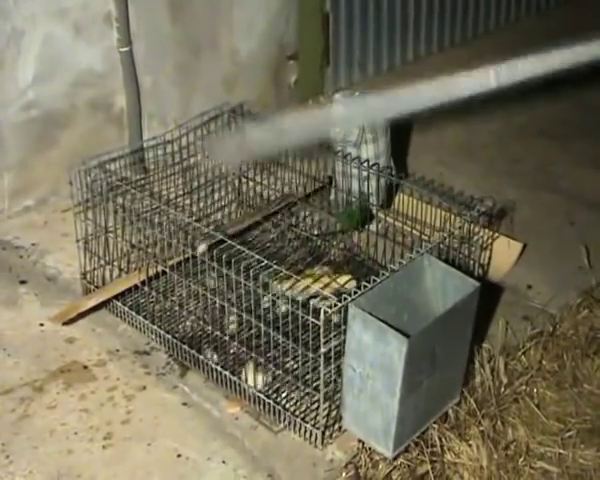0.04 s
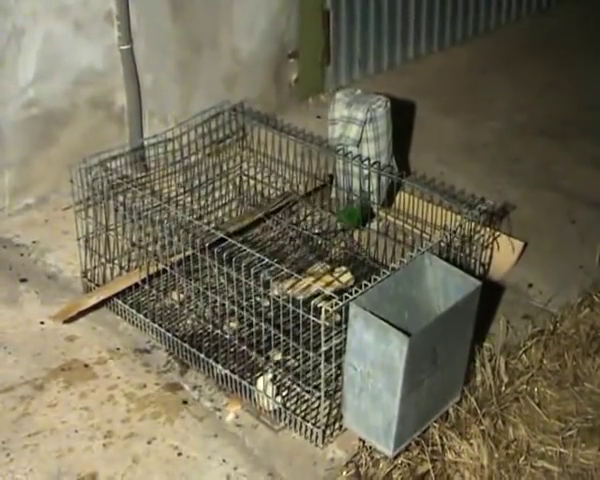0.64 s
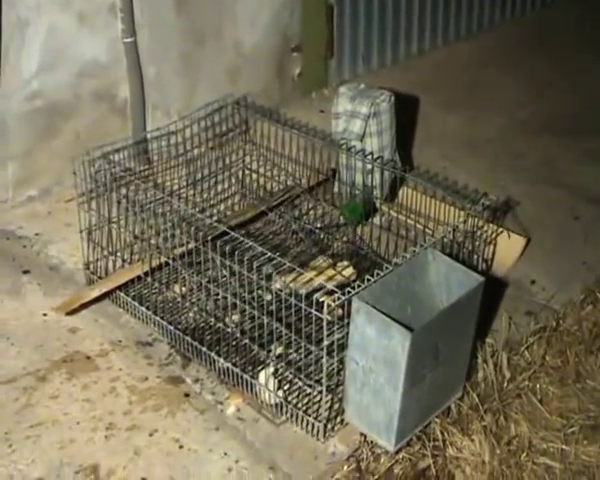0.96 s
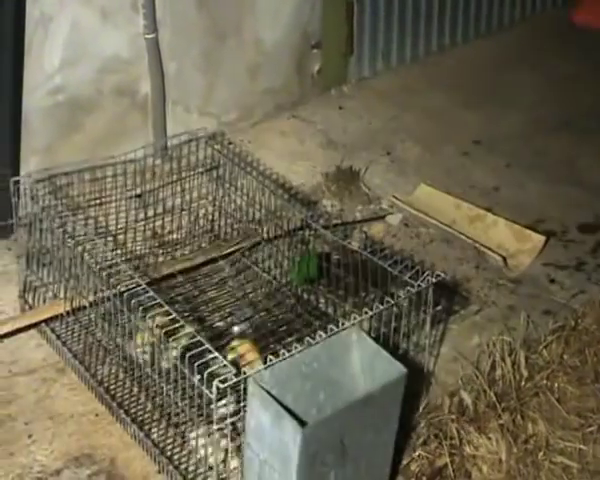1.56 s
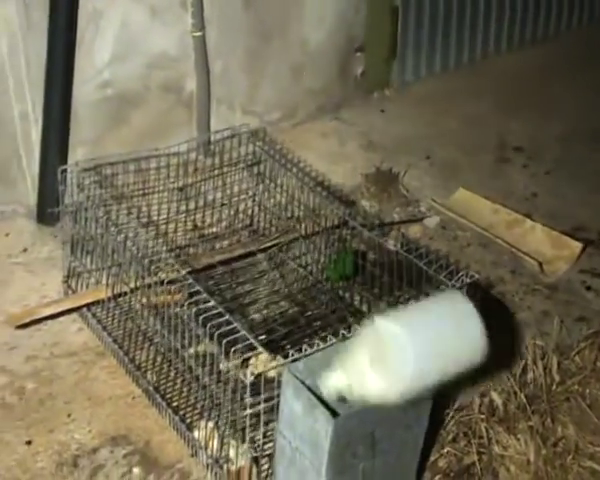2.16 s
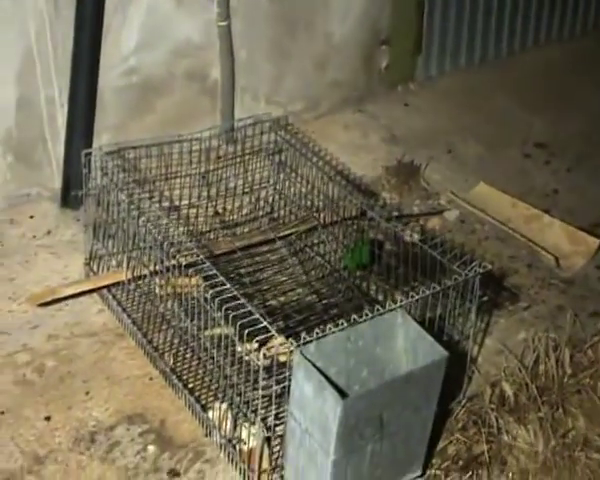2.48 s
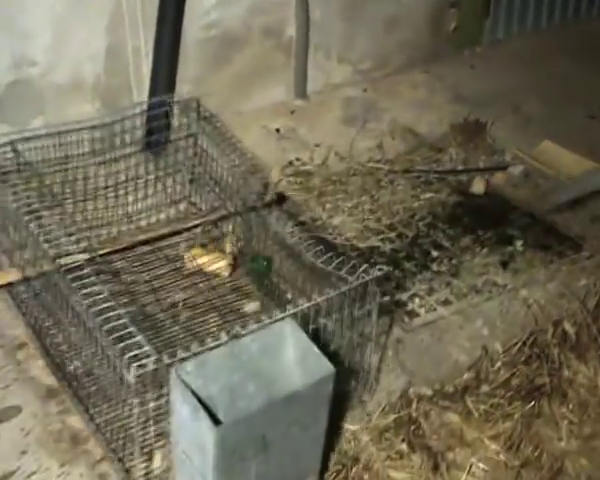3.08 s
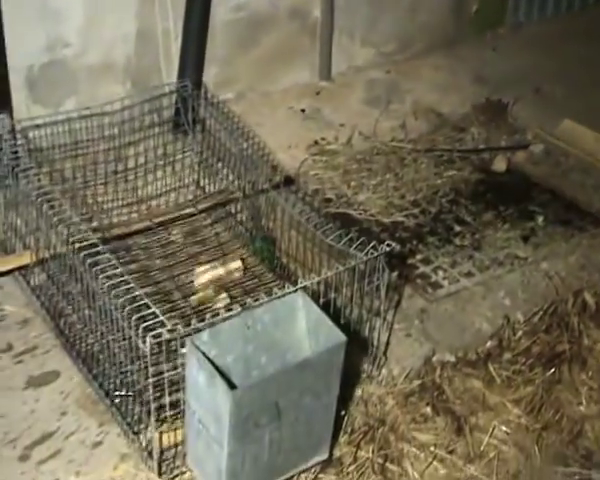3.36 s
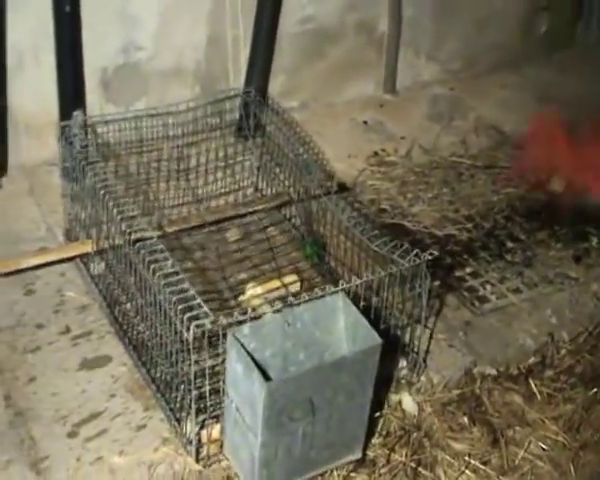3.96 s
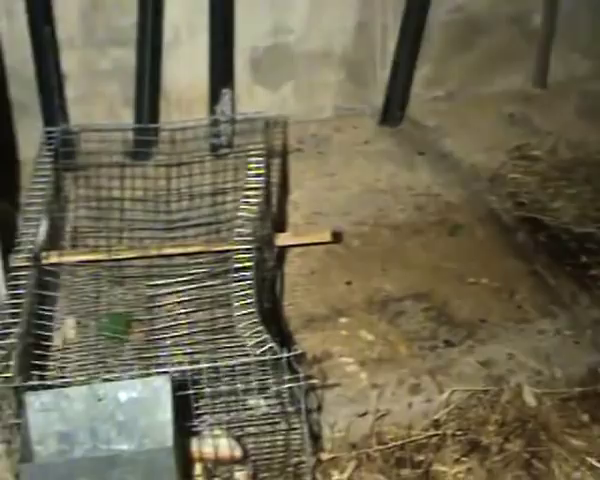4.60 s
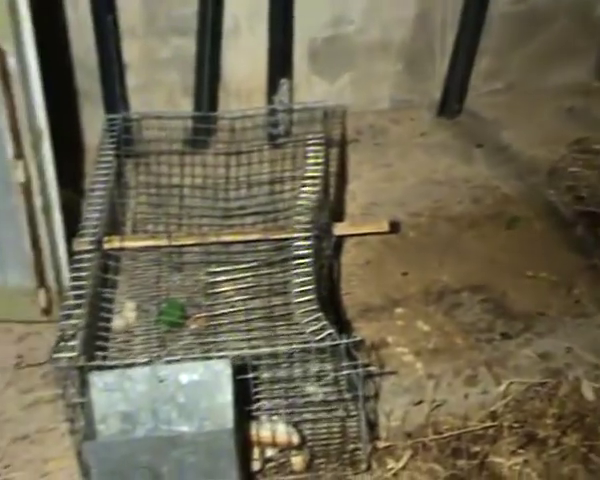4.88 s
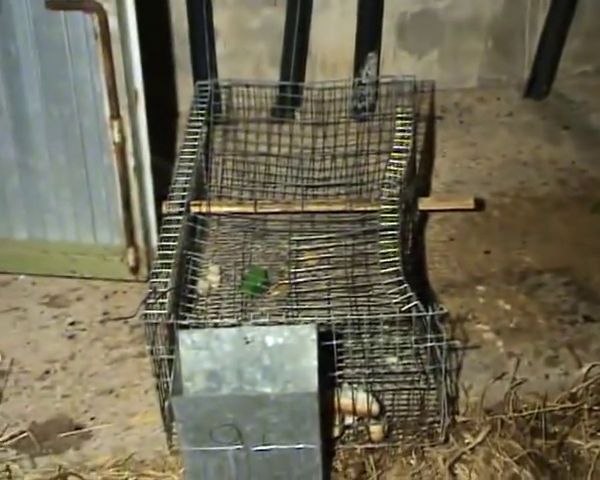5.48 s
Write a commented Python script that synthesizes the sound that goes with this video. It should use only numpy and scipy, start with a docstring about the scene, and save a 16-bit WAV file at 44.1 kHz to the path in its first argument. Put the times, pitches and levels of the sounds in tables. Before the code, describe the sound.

A metal bar crashes repeatedly against a wire cage, which rattles and rings, with a plastic bottle bouncing and sheet metal rumbling.

```python
"""Striking a wire cage

A metal bar hits a wire cage on a concrete floor: each blow crashes, then the mesh shakes, loose rods
ping and the frame thumps. Fine spray hisses, scraps patter down, and a plastic bottle falls on the
cage and bounces away. The last blow shoves the cage against a sheet-metal wall, which rumbles while
metal goes on clacking. The loudest peaks overload the microphone."""
import sys
import numpy as np
from scipy import signal
from scipy.fft import rfft, irfft, next_fast_len
from scipy.io import wavfile
from scipy.ndimage import uniform_filter1d, map_coordinates

SR = 44100
rng = np.random.default_rng(int(sys.argv[2]) if len(sys.argv) > 2 else 0)


def unload_wav(signal):
    """Save mono or channel-first audio to the path in sys.argv[1] as 16-bit WAV at rate SR, clipped to [-1, 1]."""
    wavfile.write(
        sys.argv[1],
        SR,
        np.round(np.clip(np.atleast_2d(signal).T, -1, 1) * 32767).astype(np.int16),
    )


N = 248724
TIME = np.arange(N) / SR  # seconds into the scene
AGE = TIME[:SR]  # seconds into a one-second sound

# the bright tone of jingling wires: f/Hz, level/dB
JINGLE_SPECTRUM = [(1500, -13), (2800, 11.5), (3700, 5), (6200, 0.5), (7800, 1), (10000, 2), (12000, -5.5),
                   (15500, -11.5)]


def amp(db):
    """Turn decibels into a gain to multiply by."""
    return 10 ** (np.asarray(db) / 20)


def unit(x):
    """Scale a sound to an average (rms) level of 1."""
    return x / np.sqrt(np.mean(x ** 2) + 1e-20)


def along(points, hz):
    """Read between (frequency, value) points, spacing octaves evenly."""
    freqs, values = np.transpose(points)
    return np.interp(np.log(hz + 1), np.log(freqs), values)


def filtered(x, response):
    """Multiply each frequency in a sound by response(hz)."""
    size = next_fast_len(len(x) + 8192)
    return irfft(rfft(x, size) * response(np.fft.rfftfreq(size, 1 / SR)), size)[:len(x)]


def coloured(x, spectrum):
    """Shape a sound with a table of levels by frequency; rms 1."""
    return unit(filtered(x, lambda hz: amp(along(spectrum, hz))))


def noise(spectrum, size):
    """Noise with the given spectrum; rms 1."""
    return coloured(rng.standard_normal(size), spectrum)


def resonance(hz, centre, width):
    """How one mode (a natural note of an object) responds at each frequency."""
    return 1j * hz * width / (centre ** 2 - hz ** 2 + 1j * hz * width)


def resonate(x, modes):
    """Pass a sound through modes given as f/Hz, width/Hz, level/dB; rms 1."""
    return unit(filtered(x, lambda hz: sum(amp(db) * resonance(hz, f, width) for f, width, db in modes)))


def fade(t60):
    """A one-second gain curve that falls by 60 dB every t60 seconds."""
    return np.exp(-np.log(1000) * AGE / max(t60, 1e-3))


def onset(rise_s):
    """A one-second gain curve that climbs from 0 towards 1."""
    return 1 - np.exp(-AGE / rise_s)


def ring(hz, t60):
    """One pure note dying away."""
    return np.sin(2 * np.pi * (hz * AGE + rng.random())) * fade(t60)


def swell(start, rise_s, hold_s, fall_db_per_s, drop_db=0, drop_s=0.05):
    """A gain that rises and holds, then drops as the first violent motion dies and keeps falling."""
    age = np.maximum(TIME - start, 0)
    late = np.maximum(age - hold_s, 0)
    fallen_db = fall_db_per_s * late + drop_db * (1 - np.exp(-late / drop_s))
    return (1 - np.exp(-age / rise_s)) * amp(-fallen_db)


def wobble(rate, size):
    """A curve that moves to a new random value rate times a second."""
    values = rng.standard_normal(int(size * rate / SR) + 4)
    return map_coordinates(values, [np.arange(size) * rate / SR], order=1)


def add(track, t, sound):
    """Mix a sound into the track at t seconds."""
    start = round(t * SR)
    sound, start = sound[max(-start, 0):], max(start, 0)
    track[start:start + len(sound)] += sound[:N - start]


def collisions(rate, spread_db, clump_db=4):
    """Wire hits wire about rate times a second, unevenly and in little bursts."""
    kicks = (rng.random(N) < rate / SR) * rng.choice([-1, 1], N)
    return kicks * amp(spread_db * rng.uniform(-1.3, 1, N) + clump_db * wobble(55, N))


def mesh_ring(t60, click, count):
    """One touch on the mesh gives a click and a crowd of unrelated wire notes."""
    hz = (300 + 15500 * rng.random(count) ** 1.5).astype(int)
    spectrum = np.zeros(SR // 2 + 1, complex)
    spectrum[hz] = hz ** (1 / 6) * np.exp(2j * np.pi * rng.random(count))
    wires = irfft(spectrum, SR) * fade(t60)
    tick = rng.standard_normal(SR) * fade(0.016)
    return unit(wires) + click * unit(tick)


def rattle(spectrum, rate, spread_db, t60, click):
    """A stream of collisions makes the mesh ring and click."""
    ringing = signal.fftconvolve(collisions(rate, spread_db), mesh_ring(t60, click=0, count=520))[:N]
    clicks = signal.fftconvolve(collisions(rate, spread_db), rng.standard_normal(SR) * fade(0.0056))[:N]
    return coloured(unit(ringing) + click * unit(clicks), spectrum)


def singing_wires():
    """Collisions keep the longest wires ringing at a fairly even level."""
    # notes of the long wires: f/Hz, width/Hz, level/dB
    modes = [(1930, 17, -1.5), (2550, 5, 1), (2926, 25, -6.5), (5220, 32, -15.5)]
    song = resonate(collisions(rate=1300, spread_db=12, clump_db=10), modes)
    return song / np.sqrt(np.abs(uniform_filter1d(song ** 2, size=4400)) + 0.1)


def panel_drone(side_hz, side_db, lid_hz, lid_db, frame_db, upper_db, width_hz=19):
    """Collisions keep the dented panels ringing with a hollow sound."""
    # notes of the frame: f/Hz, width/Hz, level/dB
    frame_modes = [(254, 3.6, 5.5), (353, 12.2, 7), (416, 48, -40)]
    # higher notes of the bending mesh: f/Hz, width/Hz, level/dB
    upper_modes = [(611.5, 20, 2.5), (688, 8, -1.5), (798, 61, -11.5), (947, 61, -12.5), (1162, 40, -8),
                   (1350, 38, -42)]
    modes = [(side_hz, 1.6 * width_hz, side_db), (lid_hz, width_hz, lid_db)]
    modes += [(hz, width, db + frame_db) for hz, width, db in frame_modes]
    modes += [(hz, width, db + upper_db) for hz, width, db in upper_modes]
    drone = resonate(collisions(rate=900, spread_db=-2, clump_db=-0.5), modes)
    # the panels trade energy, so the total stays even
    return drone / np.sqrt(np.abs(uniform_filter1d(drone ** 2, size=2600)) + 0.038)


def shaking_cage():
    """After each impact the panels flex and drone while the wires clatter, jingle and sing."""
    # impacts that shake the cage: t/s, panel/dB, mesh/dB, jingle/dB, hold/s, drop after the hold/dB
    shakes = [(-0.02, -12, -14, -22.5, 0.035, 10.5), (1.255, -12.5, -19, -25, .135, 2),
              (2.211, -10, -19.5, -27, 0.056, 16), (2.903, -11, -15.5, -23.5, 0.078, 1),
              (4.111, -14, -14, -22.5, 0.054, 2)]
    # each impact dents and retunes the panels: side/Hz, side/dB, lid/Hz, lid/dB, frame/dB, upper/dB
    dents = [(545, 3, 678, 4, -5, -8), (522, 2, 680, 5, -6, -4), (517, 2, 664, 4, -10, -5),
             (485, -3, 625, 6, -10, 4), (472, 2, 685, 2, -8, 8)]
    # the cage rocks back onto the floor and scrapes: t/s, length/s, panel/dB, mesh/dB, jingle/dB
    rebounds = [(0.198, 0.02, -24.5, -30.5, -40), (1.535, 0.099, -29, -24.5, -31.5),
                (3.232, 0.027, -27, -20.5, -34), (3.617, 0.023, -40, -34, -42.5),
                (4.335, 0.033, -28, -16.5, -22)]
    # the tone of the clattering mesh: f/Hz, level/dB
    mesh_spectrum = [(40, -29), (90, -20), (200, 6), (400, 0.5), (850, 4.5), (1400, -1), (1950, 3),
                     (2800, -1), (3700, -27), (6000, -49)]
    panel_rise_s, wire_rise_s = 0.018, 0.0029  # heavy panels take longer to get going
    clatter = rattle(mesh_spectrum, rate=900, spread_db=1.5, t60=0.3, click=0.51)
    jingle = amp(6) * rattle(JINGLE_SPECTRUM, rate=760, spread_db=-2.5, t60=0.15, click=0.57)
    song, out = singing_wires(), np.zeros(N)
    next_times = [row[0] for row in shakes[1:]] + [np.inf]
    for (t, panel_db, mesh_db, jingle_db, hold, drop_db), next_t, dent in zip(shakes, next_times, dents):
        gains = np.array([
            amp(panel_db) * swell(t, panel_rise_s, hold, fall_db_per_s=46, drop_db=drop_db),
            amp(mesh_db) * swell(t, wire_rise_s, hold, fall_db_per_s=38.5, drop_db=drop_db),
            amp(jingle_db) * swell(t, wire_rise_s, hold, fall_db_per_s=47, drop_db=drop_db)])
        for start, length, *levels_db in rebounds:
            if t < start < next_t:
                scrape = swell(start, rise_s=0.0077, hold_s=length, fall_db_per_s=139)
                gains = np.hypot(gains, amp(levels_db)[:, None] * scrape)  # energies add up
        panel_gain, mesh_gain, jingle_gain = gains
        song_gain = amp(mesh_db - 16) * swell(t, panel_rise_s, hold, fall_db_per_s=27, drop_db=drop_db / 2)
        out += panel_gain * panel_drone(*dent)
        out += mesh_gain * clatter + jingle_gain * jingle + song_gain * song
    return out


def bar_blows():
    """The bar crashes as it rakes over many wires in a few hundredths of a second."""
    # hard hits on the mesh: t/s, level/dB, contact time/s
    blows = [(-0.01, -15.5, 0.013), (0.203, -25, 0.012), (1.257, -9, 0.031), (2.229, -17, 0.015),
             (2.26, -45, 0.0028), (2.904, -1, 0.017), (3.204, -20, 0.0068), (4.11, -1, 0.017),
             (4.353, -17, 0.057)]
    # the tone of the crash: f/Hz, level/dB
    crash_spectrum = [(60, -22.5), (250, -8.5), (700, -14.5), (2000, 4.5), (3200, 1), (5000, -2.5),
                      (8000, 0), (11000, -6), (15500, -15)]
    out = np.zeros(N)
    for t, db, contact_s in blows:
        rake = noise(crash_spectrum, SR) * np.exp(-(AGE / contact_s) ** 2) * onset(0.004)
        mesh = mesh_ring(t60=1.0, click=9.0, count=400)
        add(out, t, amp(db) * signal.fftconvolve(rake, mesh / np.linalg.norm(mesh))[:SR])
    return out


def chatter(hz, t60, detune=0.00247, rough=0.38):
    """One note of a loose part, which sits differently each time and keeps brushing the mesh."""
    cycles = hz * (1 + detune * rng.normal()) * AGE + rng.random()
    tone = np.sin(2 * np.pi * cycles + rough * wobble(115.6, SR))
    flicker = np.exp(rough * wobble(70, SR))
    return tone * flicker * fade(t60)


def pings(vary_db=0.5, focus_db_per_octave=7, stray_db=-15.5):
    """Loose steel parts ring until they land; where they are hit decides which notes stand out."""
    # loose parts strike: t/s, rod/dB, wire/dB, hook/dB, favoured f/Hz
    strikes = [(0.0, -26, -29, -25.5, 3000), (0.204, -37.5, -42, -31.5, 2820),
               (0.41, -56, -52, -41.5, 2500), (1.676, -27.5, -33.5, -34, 3560),
               (1.838, -47, -40.5, -42, 5230), (1.877, -41, -46, -52, 11100),
               (2.988, -38, -25.5, -41, 1880), (3.053, -36, -28.5, -16, 2500),
               (3.105, -30, -23.5, -6.5, 10000), (3.183, -24, -28, -24, 3460),
               (3.204, -25.5, -19.5, -32, 6500), (3.275, -30, -27.5, -18, 7000),
               (3.384, -27, -36, -57, 5500), (3.466, -24, -50, -34, 2140), (4.048, -56, -57, -39.5, 2500),
               (4.126, -27, -28, -23, 7100), (4.228, -49, -37, -19.5, 2500), (4.465, -40, -25.5, -26, 4700),
               (4.528, -44, -33.5, -46, 2560), (4.548, -33.5, -34.5, -46, 7900)]
    # notes of a rod, a wire and a hook: f/Hz, level/dB, t60/s
    rod = [(1900, 6.5, 0.57), (2996, 4, 0.35), (3670, -8, 0.58), (5050, 1.5, 0.38), (5310, 5.5, 0.25),
           (7020, 2.5, 0.25), (7560, 10, 0.2), (7850, -17, 0.2), (9100, -12, 0.38), (9200, 9, 0.11),
           (11000, -13, 0.41), (11430, -15, 0.23), (13600, -10, .25)]
    wire = [(1935, 8, 0.86), (3124, 4.5, 0.62), (4060, -7.5, 0.74), (5160, -4, 0.41), (5750, -17, 0.9),
            (6700, -24, 0.24), (8130, 3.5, 0.052), (9500, -14, 0.2), (12500, -5, .3), (14500, -12, .25)]
    hook = [(2516, 3, 1), (7850, -29, 0.4), (9000, -10.5, 0.18)]
    free_s, landed_db_per_s = 0.087, 200
    envelope = onset(0.0014) * amp(-landed_db_per_s * np.maximum(AGE - free_s, 0))
    out = np.zeros(N)
    for t, rod_db, wire_db, hook_db, favoured_hz in strikes:
        for part_db, modes in ((rod_db, rod), (wire_db, wire), (hook_db, hook)):
            tone = np.zeros(SR)
            for hz, db, t60 in modes:
                loss_db = focus_db_per_octave * abs(np.log2(hz / favoured_hz))
                tone += amp(db - loss_db + vary_db * rng.normal()) * chatter(hz, t60)
            add(out, t, amp(part_db) * tone * envelope)
        nearby_wires = coloured(mesh_ring(t60=0.21, click=0.13, count=40), JINGLE_SPECTRUM)
        add(out, t, amp(max(rod_db, wire_db) + stray_db) * nearby_wires)
    return out


def frame_thumps():
    """The whole frame knocks on the floor and the wall with a low thud."""
    # knocks of the frame: t/s, level/dB, f/Hz, t60/s
    thumps = [(0.0, -30, 229, 0.49), (1.257, -6.5, 270, 0.13), (1.53, -41, 105, 0.18), (2.223, -29, 89, .2),
              (2.562, -14, 60.3, 0.037), (3.267, -23, 240, 0.096), (3.352, -12.5, 190, 0.098),
              (4.385, -29.5, 188, 0.53), (4.482, -32, 69.4, 0.3), (4.559, -33.5, 90.3, 1.4),
              (5.1, -20, 810, 0.043), (5.456, -21, 445, 0.079)]
    out = np.zeros(N)
    for t, db, pitch, t60 in thumps:
        thud = unit(filtered(rng.standard_normal(SR), lambda hz: resonance(hz, pitch, 1.9 * pitch) ** 2))
        add(out, t, amp(db) * (0.5 * thud * fade(t60) + ring(pitch, t60)) * onset(0.0044))
    return out


def room_echo(x):
    """Concrete and sheet walls throw the sound back; the treble dies first."""
    # how long the room rings: f/Hz, t60/s
    decay_times = [(100, 0.72), (700, 0.44), (2500, 0.43), (8000, 0.1), (15000, 0.14)]
    hz, t, bands = signal.stft(rng.standard_normal(SR), SR, nperseg=256)
    decay = np.exp(-np.log(1000) * t / along(decay_times, hz)[:, None])
    tail = signal.istft(bands * decay, SR, nperseg=256)[1]
    tail *= 1 - np.exp(-np.arange(len(tail)) / SR / 0.0014)
    return signal.fftconvolve(x, tail / np.linalg.norm(tail))[:N]


def background():
    """A quiet, steady rush of noise."""
    # the tone of the background: f/Hz, level/dB
    spectrum = [(15, -47), (25, -46), (55, -6.5), (100, -2), (227, 4), (469, -5.5), (582, 1.5),
                (1620, -7.5), (2120, -12), (2490, -5), (3170, -21), (10400, -22), (15500, -33)]
    return amp(-48) * noise(spectrum, N)


def spray():
    """Fine spray hisses down in short showers."""
    # showers of spray: t/s, level/dB, rise/s, length/s
    showers = [(0.365, -38.5, .035, 0.15), (0.693, -35, .012, 0.021), (2.119, -37.5, .003, 0.056),
               (2.303, -42, .01, 0.11), (2.495, -44.5, .01, 0.28)]
    # the tone of the hiss: f/Hz, level/dB
    spectrum = [(100, -34), (700, -2), (2000, 1), (5000, -8), (9500, -4), (12500, -8.5), (15500, -19.5)]
    flow = sum(amp(db) * swell(t, rise, length, fall_db_per_s=272) for t, db, rise, length in showers)
    return flow * noise(spectrum, N)


def falling_scraps():
    """Each scrap lands with a small dead tick around its own pitch."""
    # scraps land: t/s, level/dB, f/Hz
    landings = [(0.69, -24, 930), (0.722, -27, 860), (0.814, -39.5, 1690), (0.898, -55, 1680),
                (0.95, -67, 1490), (0.98, -44.5, 1540), (1.06, -44.5, 2160), (1.092, -41, 1186),
                (1.111, -49, 5030), (1.989, -28, 1240), (2.05, -34.5, 1990), (2.097, -36.5, 1910),
                (2.522, -35.5, 6140), (2.666, -29.5, 1710), (2.691, -28, 6350), (2.797, -26, 1540),
                (2.842, -36, 1800), (3.584, -30, 4220), (3.634, -31, 2370), (3.798, -27.5, 9130),
                (3.893, -35, 1250)]
    out = np.zeros(N)
    for t, db, pitch in landings:
        tick = filtered(rng.standard_normal(SR), lambda hz: resonance(hz, pitch, 1.28 * pitch) ** 2 + 0.048)
        add(out, t, amp(db) * unit(tick) * (fade(0.046) + 0.56 * fade(0.011)))
    return out


def shell_crack(pitch):
    """The bottle's plastic shell gives a short crack when it is hit."""
    # the tone of the shell: f/Hz, level/dB
    spectrum = [(30, 1), (150, 4.5), (350, 8.5), (650, 6.5), (1000, -0.5), (1700, -6.5), (3000, -11),
                (6000, -14.5), (10000, -14), (15000, -26)]
    crack = unit(filtered(noise(spectrum, SR), lambda hz: resonance(hz, pitch, 0.98 * pitch)))
    return crack * (fade(0.0077) + 0.73 * fade(0.07))


def bouncing_bottle(slap_hz=720):
    """The bottle lands on one end, then slaps down flat and the air inside booms."""
    # bounces: t/s, crack/dB, crack/Hz, slap delay/s, slap/dB, boom/dB, boom/Hz
    bounces = [(2.213, -25, 1230, .016, -21, -14, 175), (2.559, -14, 2630, 0.0052, -15.5, -9.5, 220),
               (2.698, -15.5, 1100, 0.0049, -13.5, -40, 218), (2.7373, -8, 1320, .0125, -22, -17, 217.3)]
    out = np.zeros(N)
    for t, crack_db, crack_hz, delay, slap_db, boom_db, boom_hz in bounces:
        boom = (ring(boom_hz, t60=0.25) + 1.2 * ring(1.52 * boom_hz, t60=0.086)) * onset(0.0007)
        add(out, t, amp(crack_db) * shell_crack(crack_hz))
        add(out, t + delay, amp(slap_db) * shell_crack(slap_hz) + amp(boom_db) * boom)
    return out


def shuddering_wall():
    """Loose sheet metal rumbles and rattles on after each shove."""
    # shoves against the wall: t/s, level/dB
    shoves = [(4.35, -32.5), (5.41, -35)]
    # the tone of the sheet metal: f/Hz, level/dB
    spectrum = [(24, -28), (45, -24.5), (88, 0.5), (135, -2.5), (223, 4.5), (502, -3), (718, 6), (1080, -4),
                (1700, -4.5), (1870, -4.5), (2310, -9), (3010, -6.5), (3230, -19), (4730, -29), (7450, -47),
                (9900, -42), (12000, -47), (15600, -62), (22000, -120)]
    shudders = [amp(db) * swell(t, rise_s=0.04, hold_s=0.21, fall_db_per_s=4.5) for t, db in shoves]
    return np.linalg.norm(shudders, axis=0) * noise(spectrum, N) * amp(0.43 * wobble(25, N))


def metal_clacks(rise_cycles=5.8):
    """Metal knocks on metal with a short ring; softer knocks are duller and build more slowly."""
    # clacks by the wall: t/s, level/dB, treble cutoff/Hz (higher for a harder knock)
    clacks = [(4.59, -20.5, 12300), (4.645, -22.5, 9200), (4.755, -22.5, 8700), (4.861, -22, 9000),
              (5.014, -32.5, 3040), (5.077, -24, 5800), (5.181, -26.5, 4770), (5.246, -27.5, 2730),
              (5.327, -22, 10100), (5.388, -32.5, 3450), (5.451, -28.5, 5000), (5.528, -29, 7000),
              (5.541, -21, 4660), (5.604, -21.5, 7100)]
    # the tone of a clack: f/Hz, level/dB
    spectrum = [(80, -28), (300, -16), (1400, -3.5), (2200, 1.5), (3100, 2), (4500, -7), (7200, -4.5),
                (10000, -11.5), (15000, -22)]
    out, body = np.zeros(N), noise(spectrum, SR)
    for t, db, cutoff in clacks:
        soften = lambda x: unit(filtered(x, lambda hz: 1 / (1 + (hz / cutoff) ** 2)))
        ringing = soften(body + 0.43 * noise(spectrum, SR)) * fade(0.14)
        click = 1.15 * soften(noise(spectrum, SR)) * fade(0.03)
        add(out, t, amp(db) * (ringing + click) * onset(rise_cycles / cutoff))
    return out


def scene():
    """Mix everything into one channel; only the hits get the room's echo."""
    hits = bar_blows() + bouncing_bottle() + falling_scraps() + metal_clacks() + frame_thumps()
    cage = shaking_cage() + pings()
    return (hits + amp(-14) * room_echo(hits) + cage + shuddering_wall() + spray() + background())[None]


def record(dry):
    """The overloaded microphone flattens the loudest peaks, then the highest treble is cut off."""
    ceiling, top_hz = 0.95, 15600
    squashed = dry[0] / (1 + np.abs(dry[0] / ceiling) ** 6) ** (1 / 6)
    return filtered(squashed, lambda hz: hz < top_hz)[None]


dry = scene()
out = record(dry)
unload_wav(out)
```